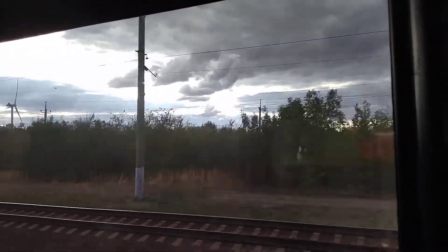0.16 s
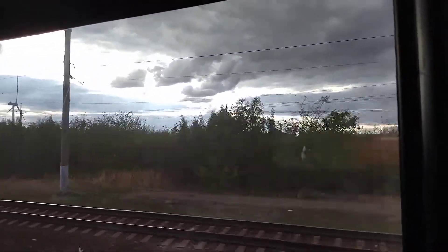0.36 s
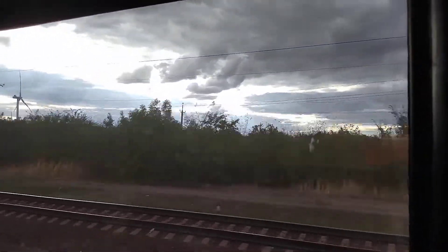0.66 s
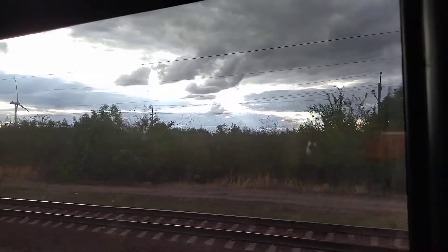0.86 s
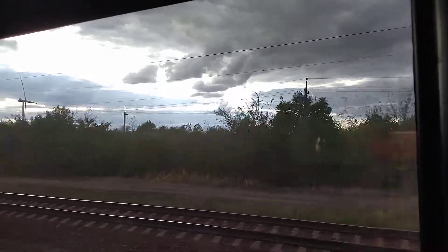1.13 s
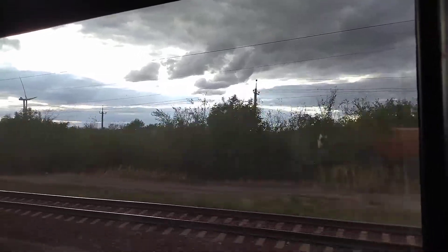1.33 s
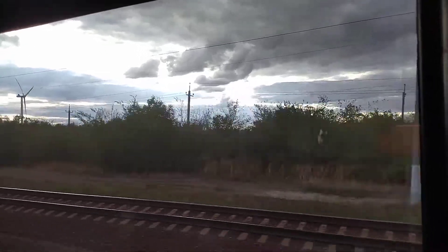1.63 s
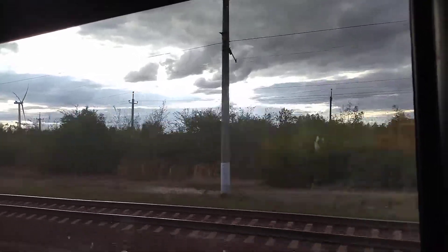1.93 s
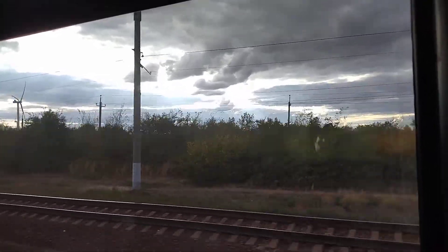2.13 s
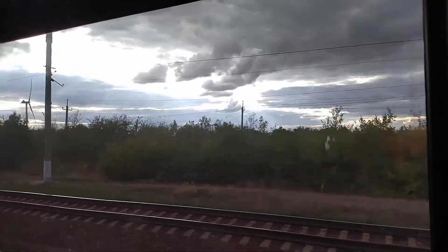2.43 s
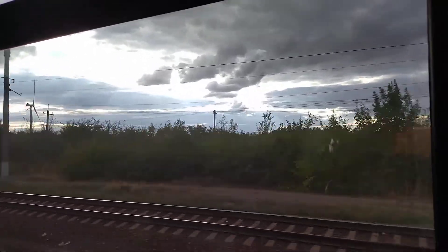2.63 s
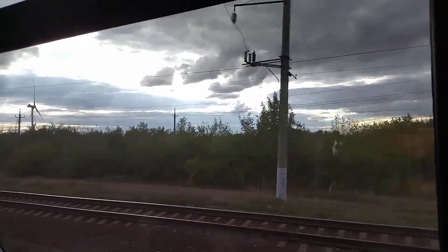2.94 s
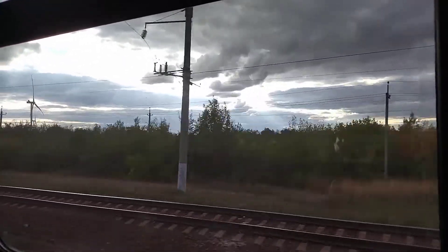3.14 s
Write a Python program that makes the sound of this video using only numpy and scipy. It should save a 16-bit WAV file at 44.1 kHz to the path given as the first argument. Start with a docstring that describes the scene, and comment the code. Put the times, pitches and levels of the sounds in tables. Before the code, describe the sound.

A moving train rumbles throughout, heard inside the carriage as a low, wavering boom over rolling noise. Wheels thump over rail joints in groups at the start and around 1, 2 and 3 seconds. A fitting knocks lightly near 1 and 2 seconds. Loose trim ticks faintly, and rustles now and then from 1.5 seconds. Brief, very high metal squeaks come at about 0.3 and 3 seconds.

```python
"""Inside a moving train carriage. From the start the body booms near 100 Hz over rolling noise and a faint
rail ring, while rail joints thump the floor and loose trim ticks. At 0.26 s something metal squeaks very
high. A fitting knocks near 1 s and 2 s, each time as a new group of thumps begins, and from about 1.5 s
the trim also rustles now and then. Near 3 s a second squeak sounds among the last thumps."""
import sys
import numpy as np
from scipy import signal
from scipy.fft import rfft, irfft
from scipy.io import wavfile
from scipy.ndimage import uniform_filter1d

SR = 44100
rng = np.random.default_rng(int(sys.argv[2]) if len(sys.argv) > 2 else 0)


def materialize(psi):
    """Save the field psi as 16-bit PCM at rate SR to the path in sys.argv[1].

    A 1-D psi becomes a single channel; in a 2-D psi each row is a channel.
    """
    bounded = np.clip(np.atleast_2d(psi).T, -1, 1)
    quanta = np.round(bounded * 32767).astype(np.int16)
    wavfile.write(sys.argv[1], SR, quanta)


N = 145089

# Strongest body mode: (time [s], level [dB])
BOOM_LEVEL = [(0, -52), (.08, -40), (.18, -43), (.22, -38), (.33, -33), (.4, -43), (.48, -43), (.57, -54),
              (.61, -35.5), (.72, -45), (.77, -42), (.84, -50), (.96, -39), (1.06, -35.5), (1.13, -48),
              (1.17, -30.5), (1.36, -31), (1.4, -50), (1.5, -41), (1.65, -36), (1.73, -47), (1.78, -37),
              (1.86, -33.5), (1.93, -36), (1.98, -47), (2.02, -36.5), (2.19, -35), (2.23, -44), (2.34, -36),
              (2.46, -48), (2.5, -41), (2.62, -44), (2.68, -54), (2.74, -42), (2.79, -50), (2.91, -36.5),
              (2.96, -49), (3, -36), (3.06, -30.5), (3.12, -38), (3.21, -42), (3.26, -30.5), (3.29, -33)]
# Its drifting pitch: (time [s], frequency [Hz])
BOOM_PITCH = [(0, 97.84), (.3, 98.26), (.63, 104.3), (.95, 96.56), (1.35, 95.9), (1.9, 96), (2.05, 99.18),
              (2.3, 94.6), (2.6, 90.36), (3, 94.54), (3.29, 97.7)]
# Wheel blows at rail joints: (time [s], level of each of the four floor modes [dB])
JOINT_BLOWS = [(0.0, -39, -68, -76, -38.5), (.198, -37.5, -33, -38.5, -41), (.285, -30.5, -71, -40, -71),
               (0.386, -58, -32, -37, -70), (1.007, -37, -51, -42.5, -44), (1.12, -36.5, -36.5, -40, -47.5),
               (1.21, -29.5, -40, -40.5, -49), (2.053, -40, -29, -54, -46.5), (2.17, -31, -40, -39.5, -50),
               (2.234, -49, -36.5, -55, -41), (2.329, -45, -38, -42.5, -65),
               (2.491, -39.5, -39.5, -73, -46.5), (2.89, -41, -39.5, -53, -64),
               (2.985, -32, -32, -38.5, -58), (3.089, -32.5, -57, -42, -45.5),
               (3.179, -37.5, -38.5, -67, -50)]
# Floor modes: (frequency [Hz], T60 [s], rise [s])
FLOOR_MODES = [(143.64, 0.39, 0.016), (191.15, 0.33, 0.0059), (239.4, 0.1, 0.0013), (400, 0.12, 0.0034)]
# Rolling noise: (frequency [Hz], relative spectral level [dB])
ROLL_SPECTRUM = [(19, -42), (41, -25), (53, -11), (76, -6), (115, -9), (160, -15), (200, -14), (225, -22),
                 (420, -22), (540, -28), (720, -37), (1270, -42), (2100, -42), (3000, -46), (4600, -50),
                 (5400, -59), (7300, -62), (9300, -56), (11200, -62), (12600, -58), (15600, -61)]
# Its swells: (time [s], relative low level [dB], relative high level [dB])
ROLL_SWELLS = [(0, -46, -64), (.1, -52, -65), (.35, -45.5, -63.5), (.55, -51.5, -62), (.9, -51.5, -63),
               (1.2, -48.5, -65.5), (1.5, -49.5, -63.5), (1.9, -52.5, -61), (2.2, -51, -61.5),
               (2.6, -51.5, -64.5), (2.9, -51.5, -65.5), (3.1, -51, -62.5), (3.29, -52, -60)]
# Its stereo width: (frequency [Hz], side minus mid [dB])
ROLL_SIDE = [(60, -30), (125, -19), (250, -9.5), (500, -7.5), (1100, 2.5), (2500, 0), (8000, 0)]
# Body resonances: (frequency [Hz], width [Hz], lift [dB])
BODY_RESONANCES = [(139.7, 24, 6), (190, 21.8, 5.5), (374, 19, -2), (2070, 23, 5.5)]
# Cabin balance: (frequency [Hz], left minus right [dB])
CABIN_BALANCE = [(30, 0), (110, -1.2), (250, 2), (600, 0), (2000, -1), (5000, 3), (12000, 3.5)]
# Knocks of the fitting: (time [s], level [dB], ring gain [dB], extra gain of low modes [dB])
KNOCKS = [(1.0095, -64, 0, 23), (1.038, -51, 1, 5), (2.002, -48, -6, 2), (2.006, -42, 1, 2),
          (2.021, -44, -1, -2), (2.067, -53.5, -8, -11)]
# Noise burst of a knock: (frequency [Hz], relative spectral level [dB])
KNOCK_SPECTRUM = [(180, -31), (300, -32), (494, 1.5), (738, -5.5), (970, 5.5), (1120, 1), (2300, 1.5),
                  (4540, -15), (5080, -23), (9370, -20.5), (14000, -42)]
# Modes of the fitting: (frequency [Hz], relative level [dB], T60 [s])
FITTING_MODES = [(445, 0.5, 0.12), (580, -7, 0.082), (965, 5.5, 0.091), (1707, -4, 0.076),
                 (2016, -11, 0.089), (2476, -1, 0.04), (3120, -22, 0.067), (4540, -17, 0.14)]
# Trim ticks: (time [s], nominal peak [dB], band centre [Hz], left minus right [dB])
TICKS = [(0.029, -56.5, 10320, -2), (0.1087, -60, 10200, -1.5), (0.3693, -44.5, 9800, 2),
         (0.5994, -57, 10400, -2), (0.7884, -58, 10320, 0), (1.293, -61, 9800, 3), (1.6994, -57, 9700, 5),
         (1.783, -57, 12000, -2), (1.8584, -58, 9900, -6), (2.5505, -55, 11600, -2),
         (2.6329, -56, 10020, 0.0), (2.7142, -60, 10180, -1.0), (2.7895, -59.5, 9600, 1.0),
         (2.8514, -57.5, 6250, 1), (3.0653, -56, 9460, 2)]
# Trim rustles: (middle [s], spread [s], level [dB], centre [Hz], width [Hz], left minus right [dB])
RUSTLES = [(1.49, 0.037, -65.5, 9700, 4500, 4), (1.933, 0.049, -68.5, 8550, 5900, 4),
           (2.221, 0.025, -64, 3700, 3030, 1), (3.208, 0.034, -57.5, 10000, 9000, 2.5),
           (3.207, 0.039, -58.5, 3640, 2950, 0)]
# Metal squeaks: (time [s], level [dB], pitch [Hz], second tone gain [dB], second pitch [Hz])
SQUEAKS = [(.255, -51, 14250, -14, 13700), (2.957, -54, 14280, -4, 14900)]


def body_boom():
    """Resonance: the strongest body mode is a wavering tone; random modulation adds fuzzy sidebands."""
    t = np.arange(N) / SR
    waver = 1 + .018 * band(rng.standard_normal(N), 0, 33)
    hz = np.interp(t, *np.transpose(BOOM_PITCH)) * waver
    carrier = np.exp(2j * np.pi * np.cumsum(hz) / SR)
    real, imag = (band(rng.standard_normal(N), 0, width_hz=24) for _ in range(2))
    fuzz = amp(-15) * (real + 1j * imag)
    envelope = amp(np.interp(t, *np.transpose(BOOM_LEVEL)))
    return envelope * np.sqrt(2) * (carrier * (1 + fuzz)).real


def rail_joints():
    """Impact excitation: each wheel blow rings the floor modes as damped sinusoids."""
    out, t = np.zeros((1, N)), np.arange(SR // 2) / SR
    for start, *levels in JOINT_BLOWS:
        for db, (hz, t60, rise) in zip(levels, FLOOR_MODES):
            detune = rng.normal(1, .013)
            mode = np.sqrt(2) * np.sin(2 * np.pi * hz * detune * t)
            add(out, start, amp(db) * mode * struck(t, rise, t60))
    return out[0]


def rolling_noise():
    """Source and filter: the body colours wheel-on-rail noise, whose lows and highs swell separately."""
    size, hop, split_hz = 1024, 256, 2400
    low_ref_db, high_ref_db, patch_db = -55, -64.5, 1.26
    t = np.arange(N // hop + 5) * hop / SR
    hz = np.fft.rfftfreq(size, 1 / SR)[:, None]
    mid_re, mid_im, side_re, side_im, patches = rng.standard_normal((len(t), len(hz), 5)).T
    patches = uniform_filter1d(patches, size=14, axis=0)  # smooth over frequency
    patches = unit_rms(uniform_filter1d(patches, size=10, axis=1))  # and over time
    times, low, high = np.transpose(ROLL_SWELLS)
    low_db = np.interp(t, times, low) - low_ref_db
    high_db = np.interp(t, times, high) - high_ref_db
    high_share = hz ** 2 / (hz ** 2 + split_hz ** 2)
    gain = amp((1 - high_share) * low_db + high_share * high_db + patch_db * patches)
    frames = np.array([mid_re + 1j * mid_im, side_re + 1j * side_im]) * gain
    noise = signal.istft(frames, nperseg=size, noverlap=size - hop)[1][:, :N]
    lift_db = sum(db * bell(N, centre, width) for centre, width, db in BODY_RESONANCES)
    mid, side = filtered(noise, response(ROLL_SPECTRUM, N) * amp(lift_db))
    side = filtered(side, response(ROLL_SIDE, N))
    return amp(-41) * unit_rms(cabin_stereo(mid) + cabin_stereo(side) * [[1], [-1]])


def fitting_knocks():
    """Modal decay and scattering: a short woody ring inside a burst that the cabin makes diffuse."""
    out, t = np.zeros((2, N)), np.arange(SR // 4) / SR
    correlation, low_modes_below_hz, max_phase_rad = -.069, 700, .72
    for start, db, ring_db, low_db in KNOCKS:
        left, other = rng.standard_normal((len(t), 2)).T
        right = correlation * left + np.sqrt(1 - correlation ** 2) * other
        burst = unit_rms(filtered(np.array([left, right]), response(KNOCK_SPECTRUM, len(t))))
        burst *= struck(t, rise=.0019, t60=.19)
        ring = 0
        for hz, mode_db, t60 in FITTING_MODES:
            decay = amp(mode_db + low_db * (hz < low_modes_below_hz) - 60 * t / t60)
            right_phase = max_phase_rad * min(hz / 1000, 1)
            ring += decay * np.sin(2 * np.pi * hz * t + [[0], [right_phase]])
        ring *= np.minimum(t * 1000, 1)  # 1 ms rise
        add(out, start, amp(db) * (burst + amp(ring_db - 3) * ring))
    return out


def trim_ticks():
    """Damped transients: loose trim gives soft hissy ticks over a random scatter of fainter ones."""
    out, t = np.zeros((2, N)), np.arange(SR // 4) / SR
    rise_s, crest_db, faint_per_s = .013, 6.5, 22
    draws = rng.random((int(faint_per_s * N / SR), 4))
    faint_ticks = [0, -61, 7000, 0] + draws * [N / SR, -6, 5000, 5]  # columns as in TICKS
    for time, db, hz, balance_db in [*TICKS, *faint_ticks]:
        noise = rng.standard_normal((2, len(t)))
        air = amp(-2) * band(noise, 14040, 3700)
        body = amp(-5) * band(noise, 5130, 2700)
        tick = (band(noise, hz, 1900) + air + body) * struck(t, rise_s, t60=.17)
        add(out, time - rise_s, amp(db - crest_db) * pan(balance_db) * tick)
    return out


def trim_rustles():
    """Amplitude modulation: loose trim rustles as grainy hiss under a Gaussian swell."""
    out, t = np.zeros((2, N)), np.arange(SR // 4) / SR
    lead_s, grain_db = 1 / 8, 3
    for middle, spread, db, hz, width_hz, balance_db in RUSTLES:
        hiss = band(rng.standard_normal((2, len(t))), hz, width_hz)
        grain = amp(grain_db * band(rng.standard_normal(len(t)), 0, 280))
        swell = np.exp(-.5 * ((t - lead_s) / spread) ** 2)
        add(out, middle - lead_s, amp(db) * pan(balance_db) * unit_rms(hiss * grain) * swell)
    return out


def metal_squeaks():
    """Narrow-band noise is heard as pitch: two very high bands make each metal squeak."""
    out, t = np.zeros((2, N)), np.arange(SR // 4) / SR
    width_hz = 150
    for start, db, hz, second_db, second_hz in SQUEAKS:
        noise = rng.standard_normal(len(t))
        noise = np.array([noise, np.roll(noise, 1)])  # arrives on the right a sample later
        tone = band(noise, hz, width_hz) + amp(second_db) * band(noise, second_hz, width_hz)
        add(out, start, amp(db) * pan(5) * tone * struck(t, rise=.009, t60=.17))
    return out


def rail_ring():
    """Resonance: the rail sustains one faint, slightly wavering tone."""
    hz = 2207 * (1 + .002 * band(rng.standard_normal((2, N)), 0, 39))
    return amp(-74.5) * np.sqrt(2) * np.sin(2 * np.pi * np.cumsum(hz, axis=1) / SR)


def cabin_stereo(x):
    """Level difference between the ears: each frequency leans left or right."""
    half = np.sqrt(response(CABIN_BALANCE, N))
    return filtered(x, np.array([half, 1 / half]))


def pan(db):
    """Level panning: left exceeds right by db."""
    return amp([[db / 2], [-db / 2]])


def struck(t, rise, t60):
    """Exponential damping after a soft rise."""
    return (1 - np.exp(-(t / rise) ** 2)) * amp(-60 * t / t60)


def band(x, hz, width_hz):
    """Gaussian band-pass at unit rms; centred on 0 Hz it gives a slow fluctuation."""
    return unit_rms(filtered(x, bell(x.shape[-1], hz, width_hz)))


def bell(n, hz, width_hz):
    """Gaussian peak over the spectrum of n samples."""
    return np.exp(-2 * ((np.fft.rfftfreq(n, 1 / SR) - hz) / width_hz) ** 2)


def response(points, n):
    """Amplitude response for n samples, interpolated in dB over log frequency."""
    hz, db = np.transpose(points)
    return amp(np.interp(np.log1p(np.fft.rfftfreq(n, 1 / SR)), np.log1p(hz), db))


def filtered(x, gain):
    """Filtering multiplies the spectrum."""
    return irfft(rfft(x) * gain, x.shape[-1])


def amp(db):
    """Decibels to amplitude."""
    return 10 ** (np.asarray(db) / 20)


def unit_rms(x):
    """Normalisation to unit power."""
    return x / np.sqrt(np.mean(x ** 2) + 1e-20)


def add(mix, start, sound):
    """Superposition from a start time in seconds."""
    part = mix[:, max(round(start * SR), 0):][:, :sound.shape[-1]]
    part += sound[..., :part.shape[-1]]


def scene():
    """Superposition: the pressures of all sources add in the cabin."""
    running = rolling_noise() + cabin_stereo(body_boom() + rail_joints()) + rail_ring()
    return running + fitting_knocks() + trim_ticks() + trim_rustles() + metal_squeaks()


def record(dry):
    """Band limiting: a steep low-pass removes the highest treble."""
    lowpass = signal.firwin(1023, 15740, window=("kaiser", 9), fs=SR)
    return signal.oaconvolve(dry, lowpass[None], "same")


dry = scene()
out = record(dry)
materialize(out)
```